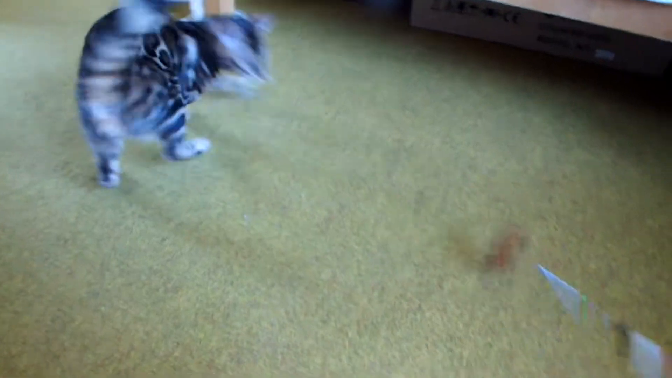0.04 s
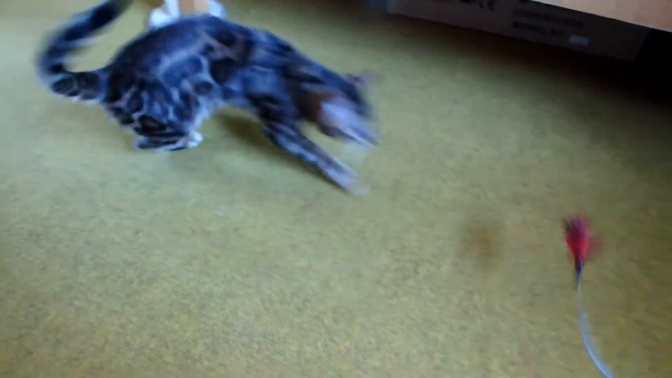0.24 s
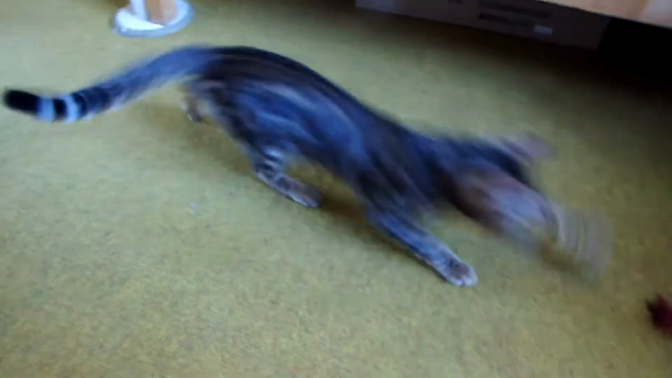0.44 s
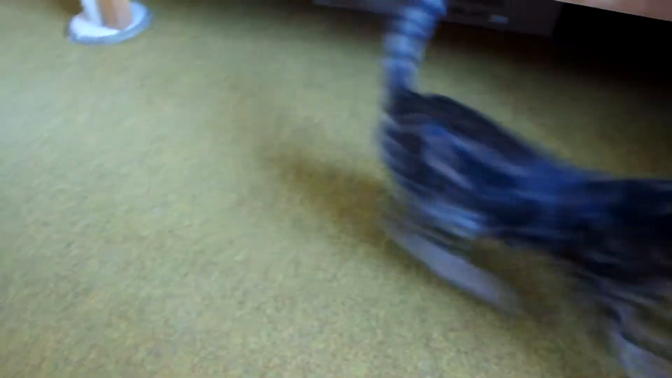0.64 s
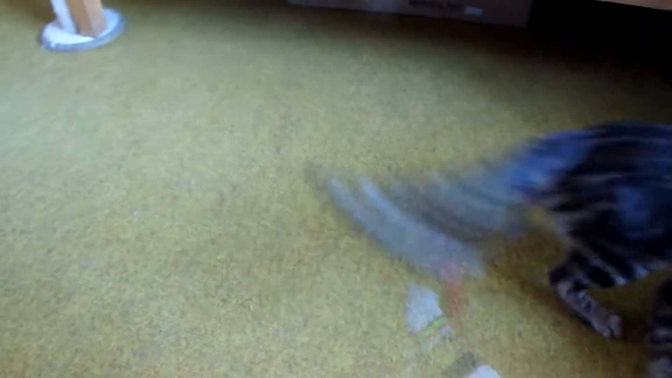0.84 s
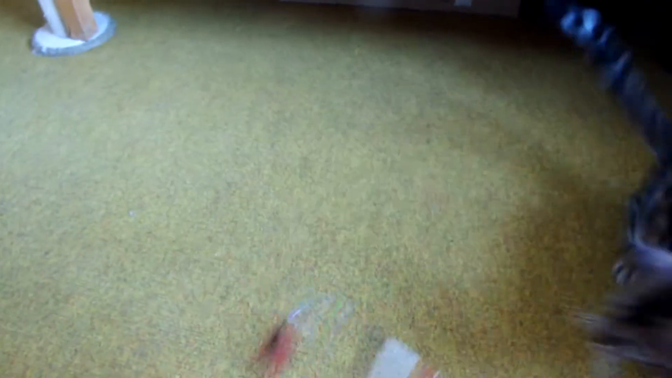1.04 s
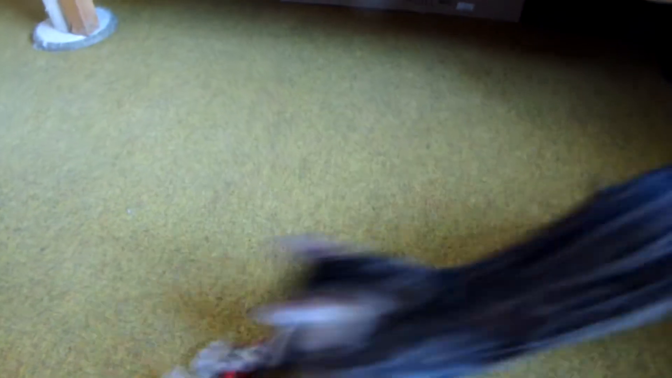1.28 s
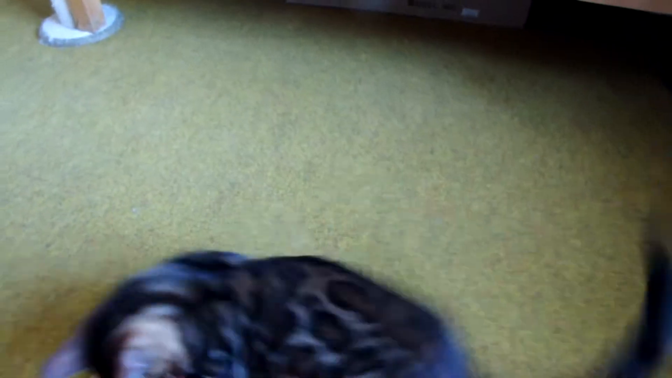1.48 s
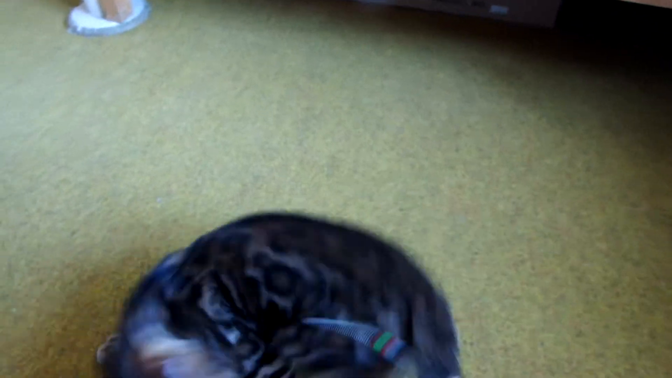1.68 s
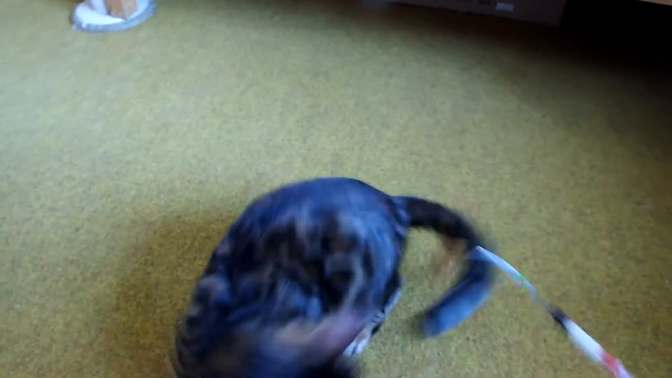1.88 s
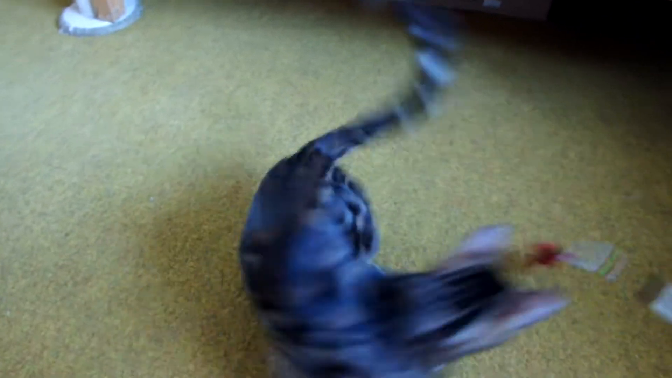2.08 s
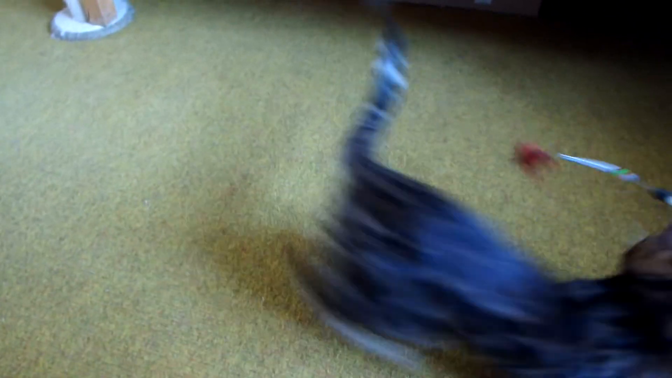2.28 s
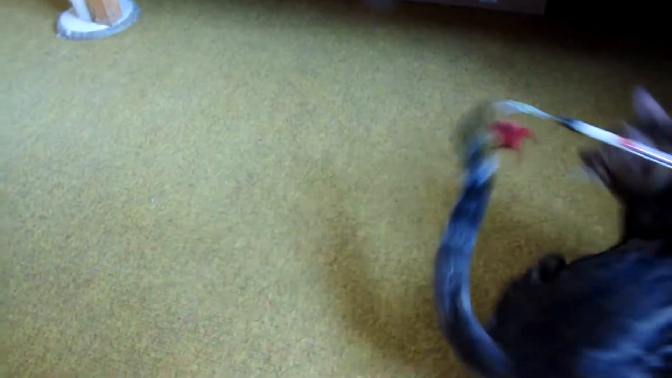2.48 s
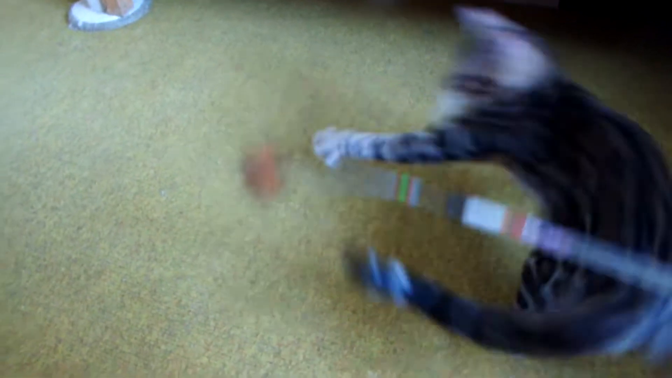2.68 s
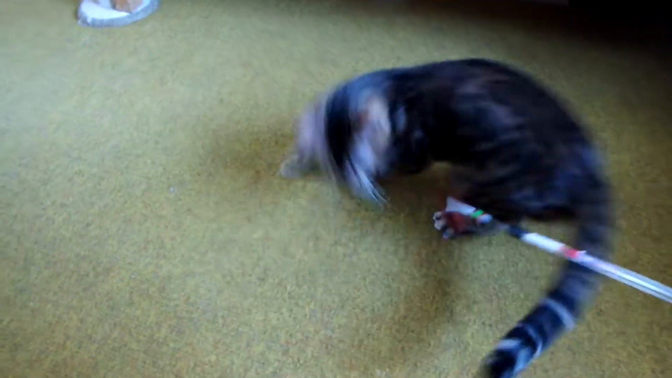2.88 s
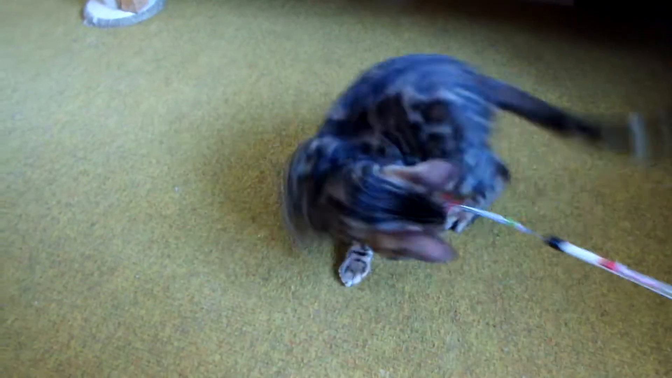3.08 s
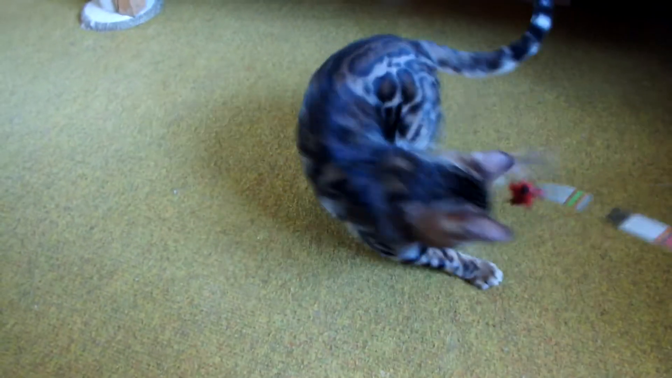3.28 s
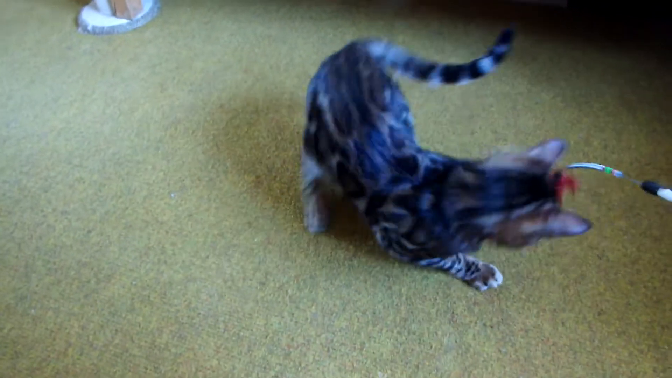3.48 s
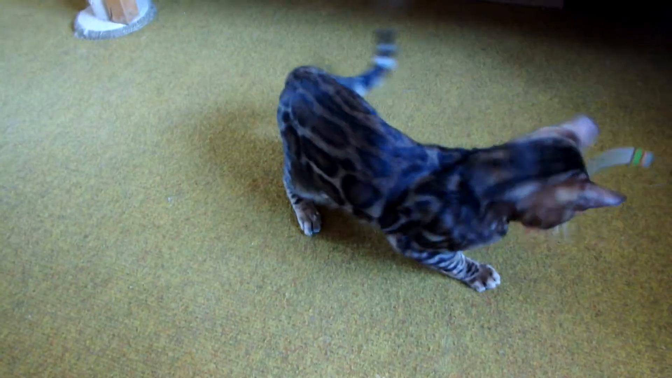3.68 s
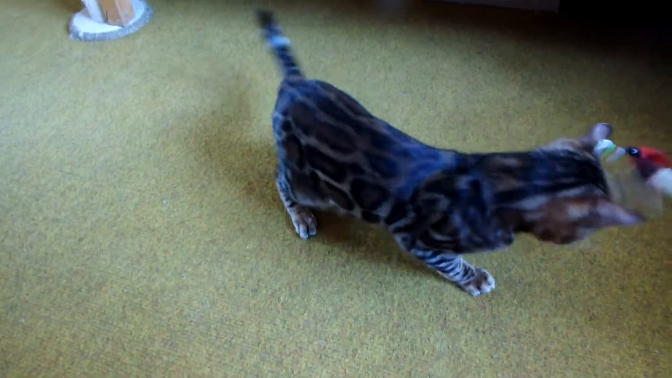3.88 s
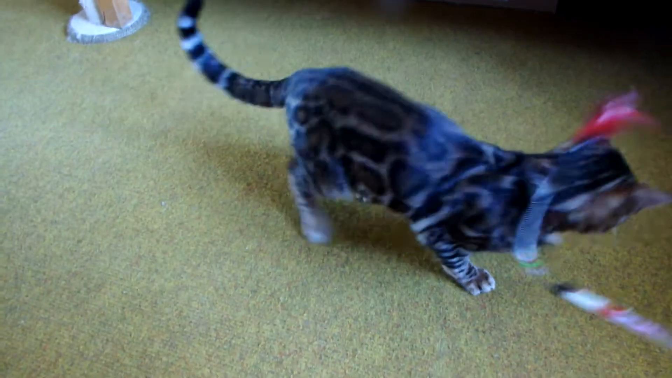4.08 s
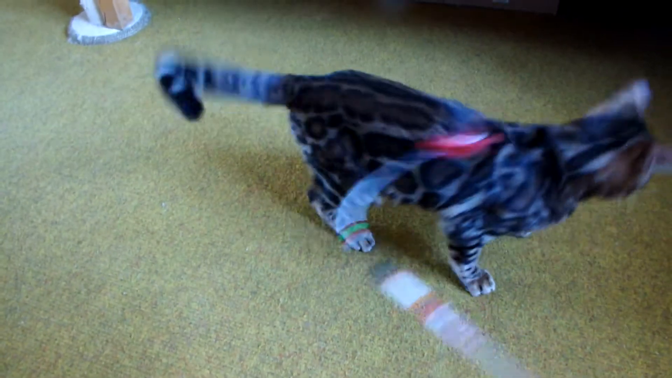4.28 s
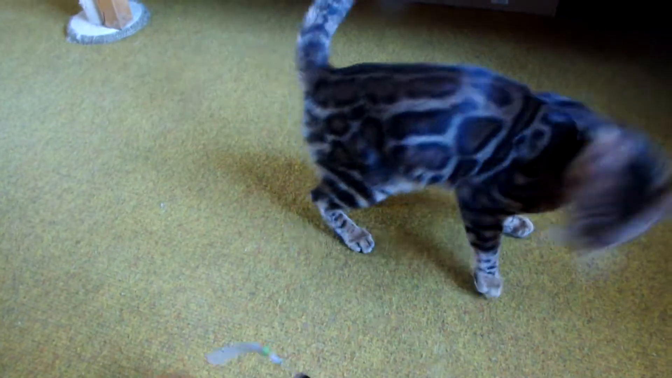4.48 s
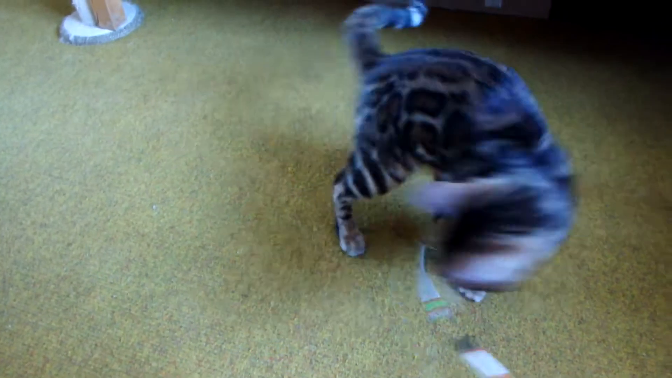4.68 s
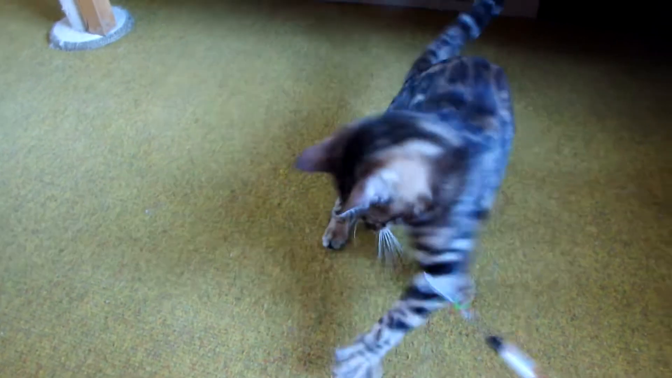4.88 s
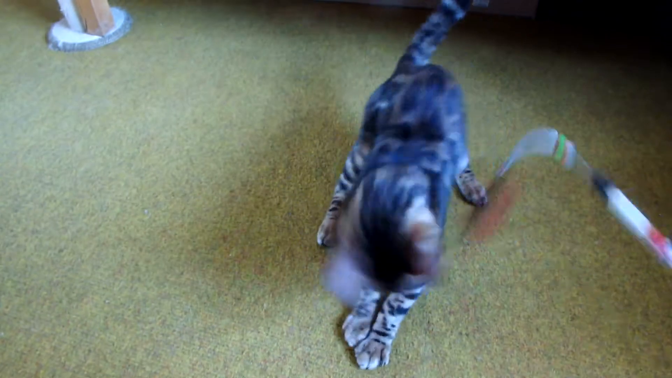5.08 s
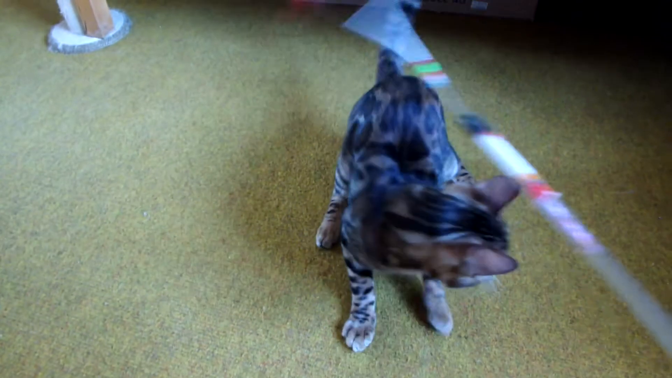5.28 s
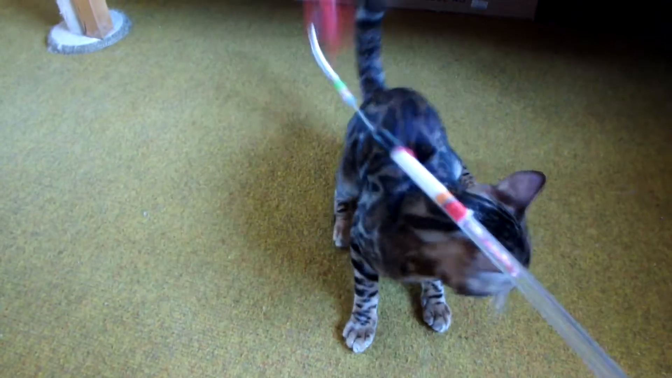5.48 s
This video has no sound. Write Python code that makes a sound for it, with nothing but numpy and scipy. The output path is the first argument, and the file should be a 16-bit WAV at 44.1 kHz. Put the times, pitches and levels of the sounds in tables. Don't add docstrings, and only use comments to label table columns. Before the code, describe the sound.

A kitten chases a wand toy across thin carpet in a small furnished room, heard close on a handheld camera with faint hiss and ticking. Thin foil rattles open, then quick paw thumps, claw clicks and scuffs burst over hollow boards that briefly hum. Later the play softens to light steps and flicks, with two firmer landings near the end.

```python
import sys
import numpy as np
from scipy import signal
from scipy.fft import rfft, irfft, next_fast_len
from scipy.io import wavfile
from scipy.ndimage import uniform_filter1d, map_coordinates

SR = 44100
rng = np.random.default_rng(int(sys.argv[2]) if len(sys.argv) > 2 else 0)


def materialize(psi):
    bounded = np.clip(np.atleast_2d(psi).T, -1, 1)
    quanta = np.round(bounded * 32767).astype(np.int16)
    wavfile.write(sys.argv[1], SR, quanta)


def linear_from_db(decibels):
    return 10 ** (np.asarray(decibels, float) / 20)


N = 244666

# [f/Hz, level/dB per Hz]
SHELL = [(2400, -30), (3000, -11), (3700, -.1), (4250, -8), (4500, -28)]
# [f/Hz, level/dB per Hz]
HISS = [(15, -31), (25, -5), (60, -2.5), (150, 5), (300, 3.5), (1100, -4.5), (1700, -1.5), (2600, -10),
        (3200, -11.5), (4200, -15), (4650, -24), (7000, -15.5), (12000, -59), (15000, -34), (15700, -27),
        (16050, -60)]
# [f/Hz, likeness]
HISS_ALIKE = [(25, -0.3), (60, 0.57), (200, 0.03), (600, -0.24), (4000, -0.051), (6800, -0.67),
              (15000, 0.41)]
# [f/Hz, left lead/radians]
PORT_LEAD = [(0, 0), (1460, -.95), (3100, -2.0), (5500, -3.3), (8400, -5.7), (11000, -6.3), (22050, -6.3)]
# [f/Hz, left gain and right loss/dB]
PORT_TILT = [(600, 0.64), (1300, 0), (2800, 0), (5000, 0.9), (10000, 0.6), (14000, -0.5)]

# [f/Hz, level/dB per Hz]
BOARDS = [(59, -66), (100, -46), (192, -14.5), (315, -6), (851, 0), (1280, -9.5), (1690, -11.5),
          (2040, -21.5), (3290, -25), (3590, -23), (6000, -40), (7800, -76), (13200, -120)]
# [f/Hz, width/Hz, lift/dB]
BOARD_MODES = [(271, 59, 6.5), (416, 86, 9), (533, 27, 9.5), (671, 10, 11), (883, 62, 8.5), (1080, 38, 3)]
# [f/Hz, decay/s]
ECHO_DECAY = [(200, 0.19), (600, 0.19), (1500, 0.27), (4000, 0.18)]
# [f/Hz, likeness]
ECHO_ALIKE = [(200, 1), (700, 0.9), (1100, 0.78), (1500, 0.53), (4000, 0.1)]
# [f/Hz, level/dB per Hz]
PILE = [(710, -4), (1200, -7), (2220, -8), (3140, -11.5), (4410, -15), (5190, -18.5), (9990, -30.5),
        (12000, -36.5), (15600, -71), (22000, -120)]
# [f/Hz, level/dB per Hz]
UNDERLAY = [(40, -40), (90, -4), (150, -20), (280, 13), (500, 14), (1000, -70)]

# [t/s, pace/dB, weight/dB]
SLIDES = [(0.0, -52, -72), (0.43, -68, -56), (0.55, -48, -41), (0.68, -38.5, -98), (0.82, -28, -66),
          (0.96, -44, -71), (1.11, -31.5, -54), (1.22, -73, -68), (1.4, -29, -73), (1.85, -69, -62),
          (2.07, -48, -79), (2.24, -60, -60), (2.46, -35, -77), (2.6, -60.5, -50), (2.8, -41.5, -62),
          (3.09, -48, -69), (3.3, -70, -61), (5.55, -62.5, -73)]

# [f/Hz, level/dB per Hz]
FOIL = [(3530, -17), (6000, -12), (7460, -11.5), (9120, -10), (10300, -11), (12100, -5.5), (13900, -7.5),
        (15200, -11), (16000, -36)]
# [t/s, level/dB, f/Hz, decay/s]
FLICKS = [(0.023, -37, 12400, 0.14), (0.194, -36.5, 11400, 0.077), (0.338, -37, 11200, 0.072),
          (0.477, -39.5, 11800, 0.11), (0.63, -27, 12700, 0.051), (1.311, -37.5, 12700, 0.22),
          (1.6786, -41, 13400, 0.075), (1.7565, -44, 13500, 0.1), (1.943, -45, 12000, 0.07),
          (2.262, -44, 10000, 0.087), (3.763, -39, 12600, 0.067), (3.8697, -36.5, 12100, 0.063),
          (3.983, -32.5, 13500, 0.032), (4.738, -32.5, 13800, 0.051)]
# [t/s, level/dB, f/Hz]
TAPS = [(0.114, -38, 11700), (0.2299, -47, 11500), (0.4094, -56, 12000), (0.497, -48, 12000),
        (0.517, -53, 11000), (0.77, -52, 13500), (0.845, -46, 13500), (0.989, -53, 12000),
        (1.0979, -47, 11600), (1.131, -44, 8900), (1.285, -53, 9410), (1.5618, -49, 11900),
        (1.641, -45, 13100), (1.8367, -52, 14500), (1.9265, -42, 11700), (2.0787, -51, 11200),
        (2.2043, -41, 12200), (2.3131, -48, 12300), (2.9677, -43.5, 12100), (3.208, -49, 12200),
        (3.264, -48, 12300), (3.3627, -54, 9550), (3.815, -43, 12200), (3.9075, -47, 13200),
        (3.933, -41, 12100), (3.9714, -62, 13200), (4.0836, -49, 10900), (4.1884, -57, 13200),
        (4.2472, -50, 13600), (4.301, -45, 8860), (4.435, -49, 9500), (4.7955, -46, 14200),
        (5.017, -43.5, 14700), (5.1715, -50, 13400), (5.2046, -46, 13500)]
# [t/s, level/dB, f/Hz]
BRUSHES = [(1.0081, -58, 12100), (2.0048, -73, 11800), (2.148, -55, 12300), (3.3877, -56, 9800),
           (3.5289, -67, 13400), (3.6476, -54, 12300), (4.0557, -69, 11000), (4.358, -73, 8950),
           (4.6623, -51, 12700), (4.9072, -55, 13400), (4.9327, -51, 11100), (5.08, -62, 13000),
           (5.335, -62, 12500)]
# [t/s, level/dB, f/Hz]
SNAPS = [(1.1322, -44, 10000), (1.641, -52, 13400), (1.388, -52, 13000), (1.945, -42, 11000),
         (2.005, -56, 13500), (2.094, -57, 11500), (2.101, -53, 11500), (2.172, -56, 11500),
         (2.343, -51, 12000), (1.8372, -47, 14500), (2.2045, -48, 12500), (2.2642, -48, 13500),
         (3.363, -51, 11000), (3.869, -45, 14000), (4.797, -50, 14000), (5.172, -53, 14000),
         (5.206, -53, 13000)]

# [middle t/s, half length/s, level/dB, f/Hz]
SWIPES = [(0.96, 0.005, -42.5, 1630), (3.086, 0.0047, -39, 1220), (0.697, 0.026, -42.5, 1470),
          (1.31, 0.015, -54.5, 6600), (1.463, 0.033, -68, 4400), (1.36, 0.01, -59, 11000),
          (1.435, 0.0068, -66, 12500), (3.3, 0.028, -57, 580), (1.96, 0.062, -64, 94),
          (0.12, 0.033, -55.5, 460), (0.19, 0.011, -53, 340), (0.51, 0.05, -50, 124),
          (1.5, 0.046, -56, 110), (3.4, 0.043, -52, 250), (5.03, 0.065, -55.5, 150),
          (4.21, 0.025, -59, 1500), (4.46, 0.04, -57.5, 422), (0.35, 0.028, -59, 2000),
          (3.232, 0.0051, -49.5, 1440), (0.87, 0.037, -49.5, 1600), (0.9, 0.0018, -33, 590),
          (1.09, 0.016, -47, 2500), (1.111, 0.042, -48, 1400), (1.48, 0.039, -41.5, 2200),
          (1.508, 0.042, -47.5, 2530), (1.727, 0.017, -38.5, 690), (2.112, 0.04, -53.5, 2450),
          (2.52, 0.0096, -40, 840), (2.471, 0.025, -47.5, 2100), (2.9, 0.0054, -39.5, 1070),
          (1.3, 0.027, -54, 3620), (2.97, 0.029, -49, 2050), (3.998, 0.045, -52.5, 150),
          (4.086, 0.044, -51, 180), (4.167, 0.014, -46.5, 950), (4.207, 0.011, -59, 1200),
          (4.412, 0.026, -47, 290), (4.564, 0.058, -54, 280), (4.67, 0.059, -60.5, 150)]
# [middle t/s, half
# length/s, level/dB, f/Hz]
SNAGS = [(0.508, 0.025, -38, 1300), (0.733, 0.0067, -32.5, 880), (0.055, 0.014, -64, 12000),
         (0.228, 0.03, -61.5, 11500), (0.377, 0.027, -66, 11500), (3.9, 0.034, -67, 12500),
         (4.02, 0.02, -69, 12100), (4.2, 0.0092, -67, 13000), (5.03, 0.022, -66, 13600),
         (1.053, 0.018, -52.5, 3600), (1.227, 0.0068, -41.5, 1400), (1.246, 0.0051, -46, 1250),
         (4.142, 0.024, -62, 3700), (4.293, 0.0068, -58, 3600), (4.306, 0.004, -57, 3600),
         (4.29, 0.006, -62, 1750), (0.622, 0.002, -42, 2600), (1.868, 0.037, -58.5, 3520),
         (2.625, 0.021, -48.5, 1460), (2.689, 0.013, -48, 1490), (2.796, 0.004, -38.5, 1458),
         (2.857, 0.021, -46.5, 2330), (3.235, 0.011, -61, 3730), (3.027, 0.042, -49.5, 786),
         (3.089, 0.004, -48, 3700), (4.993, 0.016, -60.5, 3650), (5.117, 0.014, -56.5, 3560),
         (5.302, 0.018, -60.5, 3740)]

# [t/s, level/dB]
CLAW_TIPS = [(0.196, -57), (0.473, -33), (0.4843, -23), (0.5063, -33), (0.693, -36), (0.706, -37),
             (0.628, -20.5), (0.988, -50), (1.0933, -34), (1.1331, -30.5), (1.339, -25), (1.412, -34),
             (0.617, -35), (2.443, -25), (2.601, -56), (2.854, -41), (2.9175, -52), (2.0258, -50),
             (2.556, -48), (1.467, -40), (1.7336, -29), (2.237, -33.5), (2.286, -28.5), (2.742, -25),
             (2.8926, -43), (3.086, -50), (3.359, -47)]
# [t/s, level/dB, knock f/Hz, after-ring level/dB]
PADDED = [(0.311, -38.5, 835, -7.5), (0.47, -27.5, 730, 3.5), (0.509, -16, 730, -19),
          (0.731, -21, 910, -29), (0.864, -21, 755, -5.5), (1.17, -23.5, 694, -8.5),
          (1.3132, -14, 780, -41), (1.7293, -21, 820, -35), (1.872, -29, 720, -9),
          (1.987, -18.5, 810, -12.5), (2.039, -31.5, 796, -18), (2.08, -32.5, 775, -3),
          (2.599, -20, 900, -10.5), (2.74, -10.5, 754, -12), (2.788, -30.5, 590, 1),
          (2.815, -23.5, 930, -15), (2.9167, -28, 1120, -7.5), (3.085, -41, 950, -7),
          (3.2809, -22, 880, -13.5), (3.356, -20, 830, -10), (3.521, -29.5, 746, -13),
          (3.918, -44.5, 704, -10), (4.057, -41.5, 353, -3.5), (4.094, -48, 350, -18),
          (4.166, -33.5, 470, -5.5), (4.199, -39, 585, -5.5), (4.394, -41.5, 417, -19),
          (4.953, -18, 747, -14), (5.061, -23, 780, -11.5)]
# [t/s, level/dB, knock f/Hz, after-ring level/dB]
CLAWED = [(0.357, -37, 1010, -8), (0.4827, -15.5, 737, -10), (0.6, -33.5, 900, 4), (0.6262, -5, 950, -14.5),
          (0.694, -31, 765, -5), (0.723, -26.5, 937, 1.5), (0.794, -25, 1000, 1.5), (0.819, -29, 820, -8),
          (0.838, -24.5, 890, -2), (0.987, -16.5, 1000, -13), (1.221, -33.5, 533, -1),
          (1.3022, -18, 785, -7.5), (1.3368, -8.5, 824, -11), (1.466, -9.5, 840, -7), (1.53, -28, 740, -18),
          (1.732, -18, 930, -10), (1.902, -37, 630, -8), (2.2353, -11, 610, -7.5), (2.2847, -13, 810, -8.5),
          (2.434, -21, 850, 2), (2.4379, -20.5, 910, -4.5), (2.509, -35, 540, -1), (2.8907, -22, 826, -3.5),
          (3.2752, -25, 860, -35)]
# [t/s, level/dB, f/Hz]
BOARD_HUMS = [(0.486, -47, 582), (0.486, -37, 785), (0.486, -36.5, 880), (0.628, -48, 680),
              (0.628, -36, 871), (0.628, -48, 1070), (0.727, -35, 425), (0.727, -41, 682),
              (0.727, -33, 934), (0.795, -46, 780), (0.795, -38, 943), (0.795, -36.5, 1115),
              (0.989, -40.5, 406), (0.989, -46, 678), (0.989, -47, 1050), (1.305, -38, 491),
              (1.305, -38, 693), (1.305, -35, 876), (1.339, -35, 675), (1.339, -34, 750),
              (1.339, -26.5, 867), (1.468, -27, 533), (1.468, -27.5, 671), (1.468, -43, 892),
              (1.732, -42.5, 316), (1.732, -37.5, 408.4), (1.732, -38.5, 811), (1.988, -48, 523),
              (1.988, -43, 845), (1.988, -53.5, 1110), (2.237, -36, 540), (2.237, -26.5, 635),
              (2.237, -31, 788), (2.287, -34, 414), (2.287, -40, 680), (2.287, -33.5, 839),
              (2.437, -35, 422), (2.437, -35, 621), (2.437, -31.5, 816), (2.602, -54, 594),
              (2.602, -50, 820), (2.602, -47, 1030), (2.742, -41, 611), (2.742, -28, 807),
              (2.742, -50, 1000), (2.893, -38.5, 414), (2.893, -60, 760), (2.893, -42, 876),
              (3.277, -41, 410), (3.277, -43, 529), (3.277, -37.5, 916), (3.358, -66, 437),
              (3.358, -46, 883), (3.358, -46, 1030), (4.955, -43.5, 323), (4.955, -37.5, 665),
              (4.955, -56, 910), (5.064, -55, 368), (5.064, -47, 666), (5.064, -49.5, 902)]
# [t/s, level/dB, f/Hz, swell/s]
THUDS = [(.628, -21.5, 517, 0.0024), (.6305, -35, 800, 0.0013), (.6395, -28, 960, 0.00068),
         (.655, -38, 689, 0.0084), (.82, -32.5, 800, 0.011), (.85, -36, 992, 0.0061),
         (0.988, -31.5, 1500, 0.0028), (1.085, -44, 950, 0.011), (1.171, -35, 1090, 0.0013),
         (1.19, -39.5, 731, 0.0044), (1.41, -43, 1160, 0.0054), (1.477, -27.5, 1630, 0.0021),
         (1.7326, -24, 425, 0.0024), (1.76, -43.5, 739, 0.014), (2.2366, -22.5, 482, 0.004),
         (2.2359, -26, 1166, 0.0022), (2.437, -32.5, 1077, 0.0056), (2.508, -38, 1395, 0.0025),
         (2.705, -41, 452, 0.0031), (2.815, -44, 426, 0.0069), (2.988, -48, 862, 0.0053),
         (3.32, -48, 965.4, 0.0065), (0.5068, -35, 890, 0.00047), (1.3043, -24.5, 810, 0.0037),
         (1.3443, -17, 815, 0.001), (2.7425, -30, 770, 0.0021), (2.896, -29.5, 433, 0.0024),
         (4.21, -43.5, 515, 0.0024), (4.232, -50, 930, 0.0022), (4.406, -58, 332, 0.0038),
         (3.375, -40.5, 429, 0.0045), (4.97, -41.5, 790, 0.0037)]

TAP_T60_S, BRUSH_T60_S = 0.035, 0.076
SWELL_SHARE = 0.064
TRAIL_DB, TRAIL_T60_S, REST_DB = -29, 0.97, -91.5
RATTLE_S, RATTLE_DB, RATTLE_LOSS_DB = 0.019, -18, -3
SWIPE_WIDTH, SNAG_WIDTH = 0.89, 0.35
PAD_PUSH_DB, PAD_TICK_DB = -13.5, -51
TOE_PUSH_DB, TOE_TICK_DB = -29.5, -20
FIRM_DB, TICK_LAGS, PUSH_LAGS = -17.5, 0.1, 0.32
KNOCK_SHARP = 2.01
MUFFLE_HZ = 6500


def unit(x):
    return x / np.sqrt(np.mean(x ** 2) + 1e-20)


def along(points, hz):
    f, value = np.transpose(points)
    return np.interp(np.log(hz + 1), np.log(f + 1), value)


def curves(rows):
    s, *columns = np.transpose(rows)
    return [np.interp(np.arange(N) / SR, s, column) for column in columns]


def filtered(x, response):
    size = next_fast_len(x.shape[-1] + 4096)
    spectrum = rfft(x, size) * response(np.fft.rfftfreq(size, 1 / SR))
    return irfft(spectrum, size)[..., :x.shape[-1]]


def spread(pair, spectrum, alike):
    def response(hz):
        turn = np.arccos(np.clip(along(alike, hz), -1, 1)) / 2
        return linear_from_db(along(spectrum, hz)) * [np.cos(turn), np.sin(turn)]

    mid, side = filtered(pair, response)
    return unit(np.array([mid + side, mid - side]))


def grains(per_s, spread_db, clump_db, clump_s):
    sizes = np.minimum(rng.exponential(size=N), 4)
    hits = (rng.random(N) < per_s / SR) * linear_from_db(spread_db * sizes)
    clumps = map_coordinates(rng.standard_normal(N), [np.arange(N) / (clump_s * SR)])
    return uniform_filter1d(hits, size=5) * linear_from_db(clump_db * clumps) * rng.standard_normal((2, N))


def add(track, s, sound):
    part = track[..., round(s * SR):][..., :sound.shape[-1]]
    part += sound[..., :part.shape[-1]]


def soft_ring(t, hz, rise_s):
    return t / rise_s * np.exp(1 - t / rise_s) * np.sin(2 * np.pi * hz * t)


def camera():
    ticks = grains(per_s=1500, spread_db=2.2, clump_db=4, clump_s=0.012)
    return linear_from_db(-70.5) * spread(ticks, SHELL, [(3700, 0.6)])


def port_hiss():
    hiss = spread(rng.standard_normal((2, N)), HISS, HISS_ALIKE)
    return linear_from_db(-57) * hiss * linear_from_db([[0.7], [-0.7]])


def slides():
    drag_db, rub_db = curves(SLIDES)
    rasp_db = -53 + 0.27 * (drag_db + 45)
    drag = spread(grains(per_s=2700, spread_db=1.0, clump_db=-3.0, clump_s=0.012), BOARDS, ECHO_ALIKE)
    rasp = grains(per_s=14000, spread_db=1.8, clump_db=1.8, clump_s=0.006)
    rasp = spread(rasp, PILE, [(1500, 0.7), (8000, 0.39)])
    rub = spread(grains(per_s=900, spread_db=3.5, clump_db=3, clump_s=0.025), UNDERLAY, [(100, 0.93)])
    return linear_from_db(drag_db - 11.0) * drag + linear_from_db(rasp_db) * rasp + linear_from_db(rub_db - 8.5) * rub


def toy():
    shake, clicks, t = np.zeros(N), np.zeros(N), np.arange(SR // 2) / SR
    shakes = list(FLICKS)
    for s, db, hz, _ in FLICKS:
        for k in (1, 2):
            rebound_db = db + RATTLE_DB + (k - 1) * RATTLE_LOSS_DB
            shakes.append((s + k * RATTLE_S, rebound_db, hz, TAP_T60_S))
    shakes += [(*row, TAP_T60_S) for row in TAPS]
    shakes += [(*row, BRUSH_T60_S) for row in BRUSHES]
    for s, db, hz, t60 in shakes:
        settle = linear_from_db(-60 * t / max(t60, 0.02)) + linear_from_db(TRAIL_DB - 60 * t / TRAIL_T60_S)
        swell = 1 - np.exp(-t / (SWELL_SHARE * t60))
        add(shake, s - 0.001, linear_from_db(db - 13.5) * settle * swell)
        add(clicks, s, linear_from_db(db - 11) * soft_ring(t, hz, rise_s=0.0003))
    shake += linear_from_db(REST_DB)
    ticks = grains(per_s=5800, spread_db=-3.0, clump_db=3.0, clump_s=0.01)
    ticks = spread(ticks, FOIL, [(7000, 0.25), (13000, 0.39)])
    pings = strand_pings(count=9000, hz_spread=0.155, life_s=0.00053, spread_db=7.0)
    return shake * (linear_from_db(4.0) * ticks + linear_from_db(-9.0) * pings) + clicks


def strand_pings(count, hz_spread, life_s, spread_db):
    when = rng.random(count) * (N - 200)
    detune = np.exp(hz_spread * rng.standard_normal(count))
    size = np.minimum(rng.exponential(size=count), 3)
    s, hz = np.transpose(sorted([row[:3] for row in FLICKS] + TAPS + BRUSHES))[[0, 2]]
    pitch = np.clip(np.interp(when / SR, s, hz) * detune, 3000, 15800)
    step = np.arange(200)
    rings = linear_from_db(spread_db * size)[:, None] * soft_ring(step / SR, pitch[:, None], rise_s=life_s)
    places = when.astype(int)[:, None] + step
    return unit(np.bincount(places.ravel(), rings.ravel(), N))


def swipes():
    out = np.zeros((2, N))
    catches = grains(per_s=15000, spread_db=1.8, clump_db=1.3, clump_s=0.004)
    strokes = [(*row, SWIPE_WIDTH) for row in SWIPES] + [(*row, SNAG_WIDTH) for row in SNAGS]
    for s, half_s, db, hz, width in strokes:
        start = max(round((s - 3 * half_s) * SR), 0)
        reach = round(6 * half_s * SR)

        def band(f):
            return 1 / (1 + ((hz * hz - f * f) / ((f + 1) * width * hz)) ** 2)

        mid, side = filtered(catches[:, start:start + reach], band)
        side = side * min(1, 4000 / hz)
        swell = np.exp(-((np.arange(reach) - reach / 2) / (half_s * SR)) ** 2)
        stroke = unit(np.array([mid + 0.64 * side, mid - 0.77 * side]))
        add(out, start / SR, linear_from_db(db) * swell * stroke)
    return out


def claw_tips():
    out, t = np.zeros(N), np.arange(SR // 100) / SR
    click = soft_ring(t, 2700, rise_s=0.0002) + soft_ring(t, 5250, rise_s=0.0002) / 2
    for s, db in CLAW_TIPS:
        add(out, s, linear_from_db(db) * click)
    return out


def paws():
    out, t = np.zeros((2, N)), np.arange(SR // 4) / SR
    steps = [(*row, PAD_TICK_DB, PAD_PUSH_DB) for row in PADDED]
    steps += [(*row, TOE_TICK_DB, TOE_PUSH_DB) for row in CLAWED]
    claw = soft_ring(t, 2600, rise_s=0.0004) + 0.4 * soft_ring(t, 4300, rise_s=0.0003)
    arrives = 1 - np.exp(-(t / 0.0037) ** 2)
    for s, db, hz, ring_db, tick_db, push_db in sorted(steps):
        cycles = hz * t / 0.8
        swell = (cycles * np.exp(1 - cycles)) ** KNOCK_SHARP
        sag = 0.26 * (1 - np.exp(-t / 0.00006))
        sound = swell * np.sin(2 * np.pi * hz * t + sag)
        sound += linear_from_db(-14.5) * soft_ring(t, 1.554 * hz, rise_s=0.00073)
        firmer_db = db - FIRM_DB
        sound += linear_from_db(push_db - PUSH_LAGS * firmer_db) * soft_ring(t, 302.5, rise_s=0.0021)
        sound += linear_from_db(tick_db - TICK_LAGS * firmer_db) * claw
        echo = linear_from_db(ring_db - 8.5) * arrives * after_ring(size=len(t), hz_paw=hz)
        add(out, s + 0.001712, linear_from_db(db - 1.0) * (sound + echo))
    return out


def after_ring(size, hz_paw):
    hz, t, z = signal.stft(rng.standard_normal((2, size)), SR, nperseg=256)
    patches_db = 2.4 * unit(uniform_filter1d(rng.standard_normal(z.shape[1:]), size=4))
    fade_db = -60 * t / along(ECHO_DECAY, hz)[:, None]
    tail = signal.istft(z * linear_from_db(patches_db + fade_db), SR, nperseg=256)[1][:, :size]
    modes = BOARD_MODES + [(hz_paw, 300, 2.5)]

    def lift(f):
        return linear_from_db(sum(db / (1 + (2 * (f - c) / w) ** 2) for c, w, db in modes))

    tail = filtered(spread(tail, BOARDS, ECHO_ALIKE), lift)
    return tail / np.sqrt(np.mean(tail[:, :SR // 40] ** 2))


def board_hums():
    out, t = np.zeros((2, N)), np.arange(SR // 6) / SR
    choke = np.exp(-(t / 0.056) ** 2) * linear_from_db(-60 * t / 0.27)
    shape = (1 - np.exp(-t / 0.00063)) * choke
    for s, db, hz in BOARD_HUMS:
        knot = rng.standard_normal(24)
        drift = 0.13 * map_coordinates(knot, [100 * t + 2]) + 3 * knot[0]
        apart = 0.25 * knot[1] * np.array([[1], [-1]])
        add(out, s, linear_from_db(db + 3.5) * shape * np.sin(2 * np.pi * hz * t + drift + apart))
    return out


def thuds():
    out, t = np.zeros(N), np.arange(SR // 8) / SR
    for s, db, hz, swell_s in THUDS:
        add(out, s, linear_from_db(db) * soft_ring(t, hz, rise_s=swell_s))
    return out


def strand_snaps():
    out, t = np.zeros(N), np.arange(SR // 8) / SR
    for s, db, hz in SNAPS:
        add(out, s, linear_from_db(db) * soft_ring(t, hz, rise_s=0.000091))
    return out


def scene():
    def muffle(f):
        return 1 / (1 + 1.4j * f / MUFFLE_HZ - (f / MUFFLE_HZ) ** 2)

    steps = filtered(claw_tips() + paws(), muffle)
    return slides() + toy() + swipes() + steps + board_hums() + thuds() + strand_snaps()


def low_pass(x):
    return signal.sosfilt(signal.butter(12, 16790, fs=SR, output="sos"), x)


def record(dry):
    hz, lead = np.transpose(PORT_LEAD)

    def ports(f):
        delay = np.exp(1j * np.outer([1, 0], np.interp(f, hz, lead)))
        bass_cut = (1j * f / (1j * f + 110)) ** 2
        return delay * bass_cut * linear_from_db(np.outer([1, -1], along(PORT_TILT, f)))

    mix = filtered(dry, ports) + port_hiss() + camera()
    mix = filtered(mix, lambda f: f < 15850)
    return low_pass(mix)


dry = scene()
out = record(dry)
materialize(out)
```